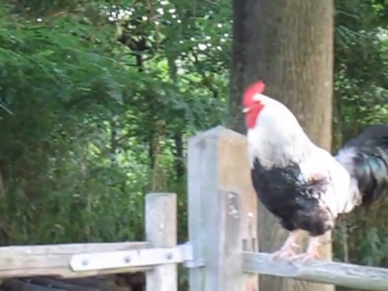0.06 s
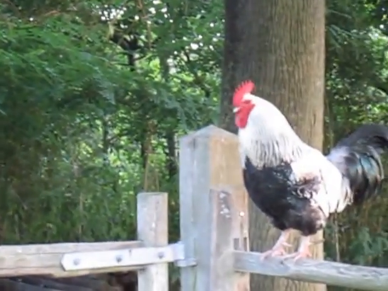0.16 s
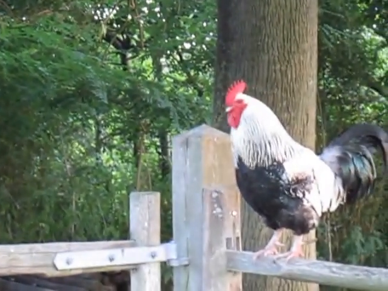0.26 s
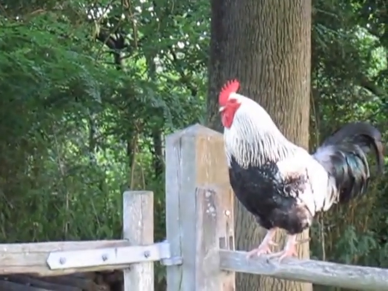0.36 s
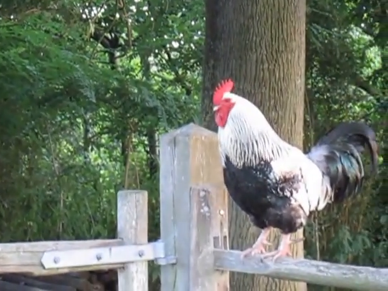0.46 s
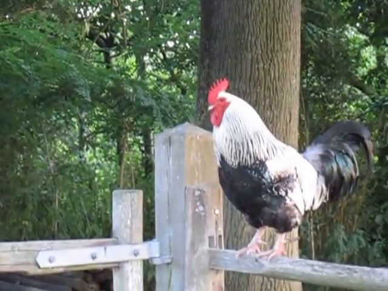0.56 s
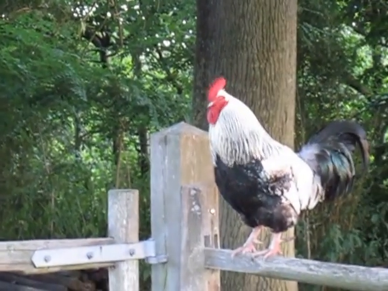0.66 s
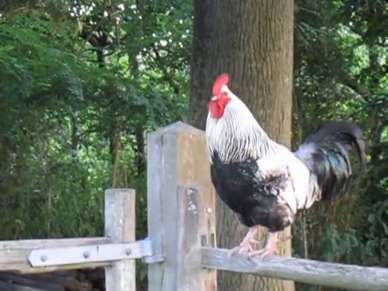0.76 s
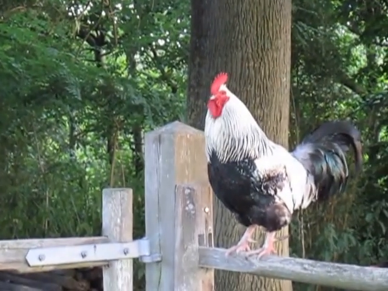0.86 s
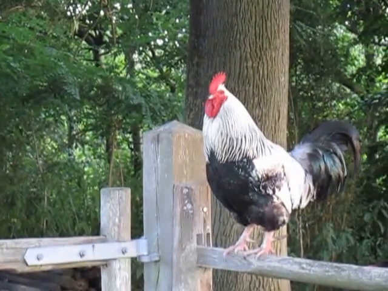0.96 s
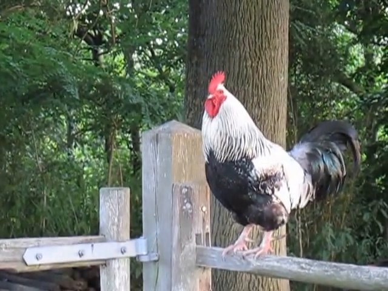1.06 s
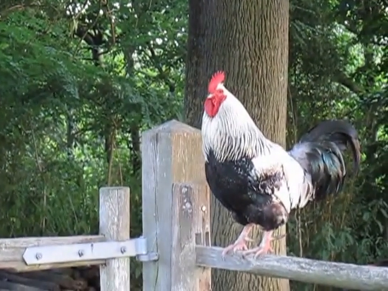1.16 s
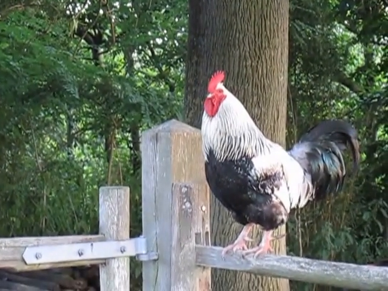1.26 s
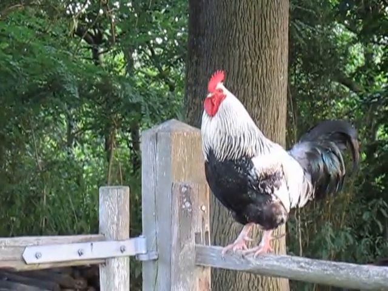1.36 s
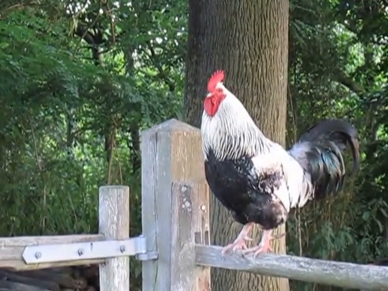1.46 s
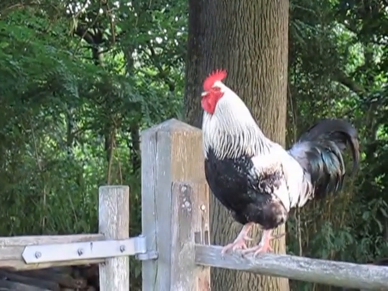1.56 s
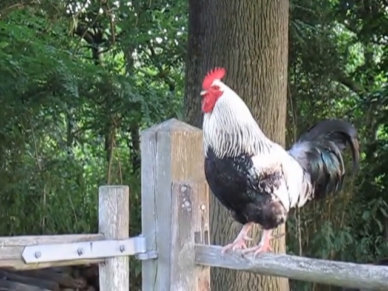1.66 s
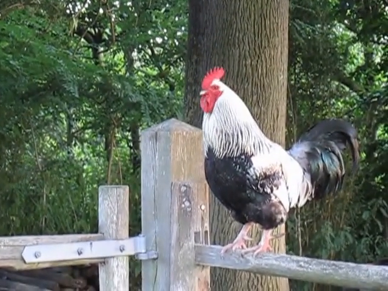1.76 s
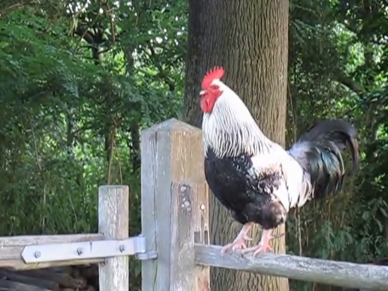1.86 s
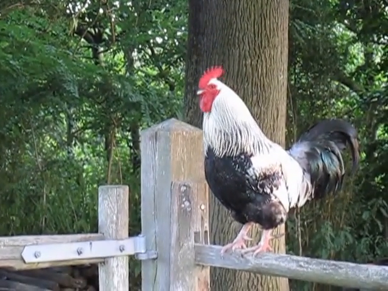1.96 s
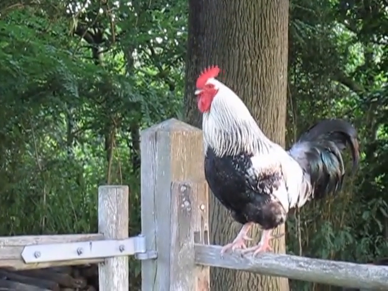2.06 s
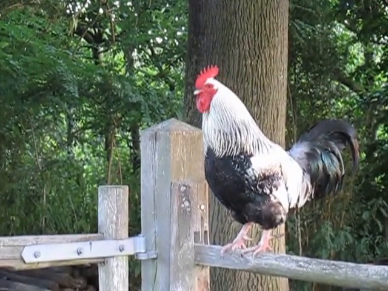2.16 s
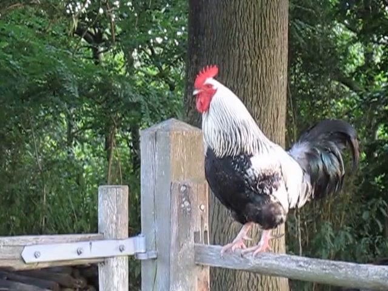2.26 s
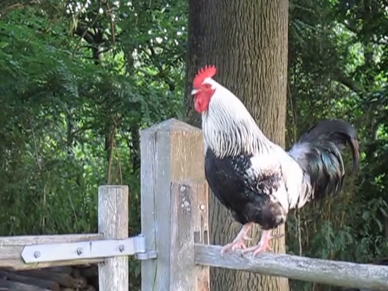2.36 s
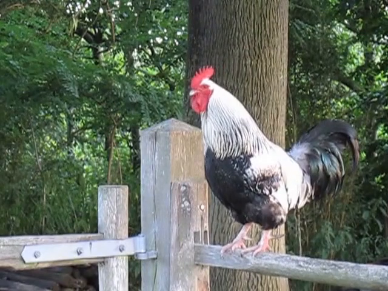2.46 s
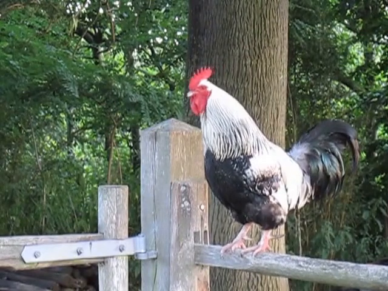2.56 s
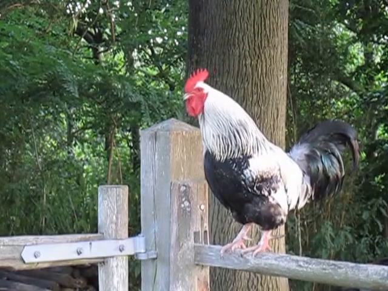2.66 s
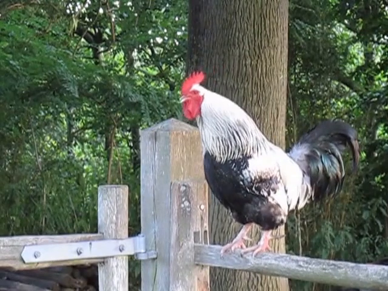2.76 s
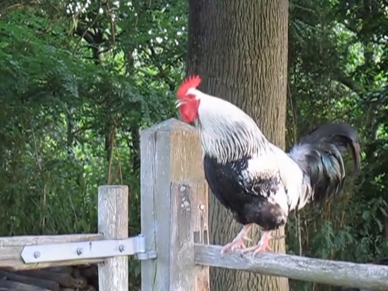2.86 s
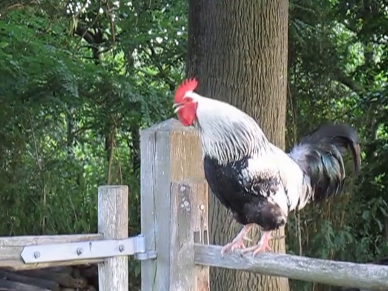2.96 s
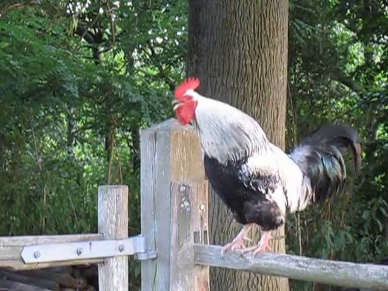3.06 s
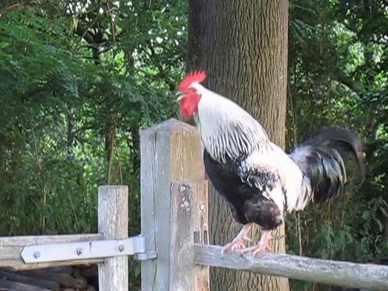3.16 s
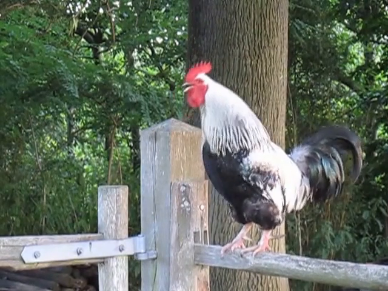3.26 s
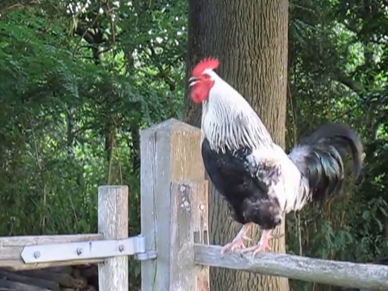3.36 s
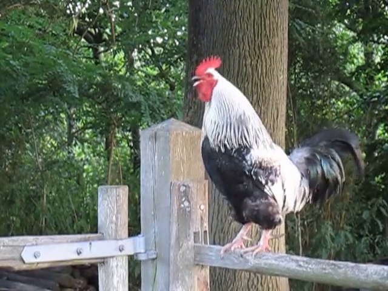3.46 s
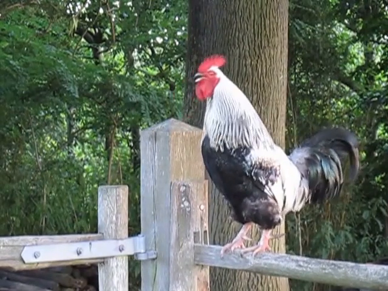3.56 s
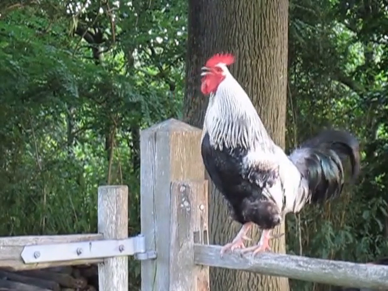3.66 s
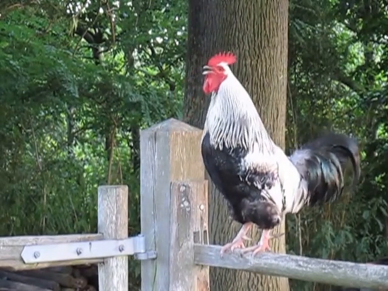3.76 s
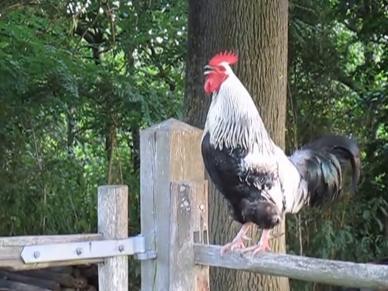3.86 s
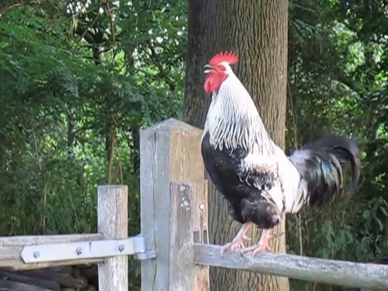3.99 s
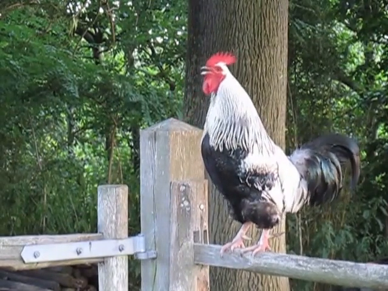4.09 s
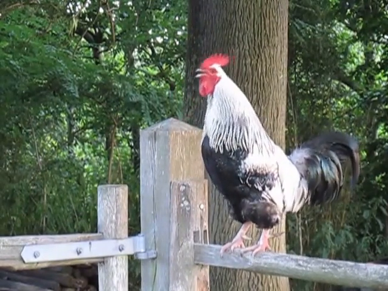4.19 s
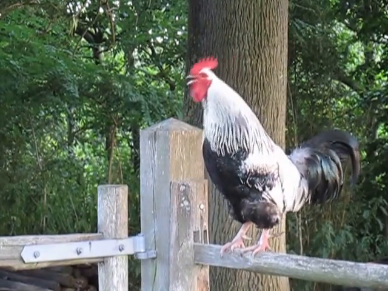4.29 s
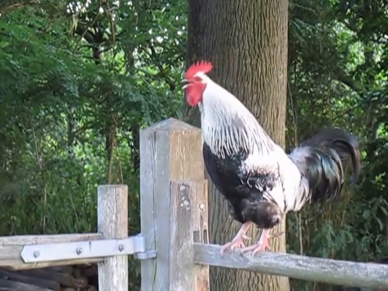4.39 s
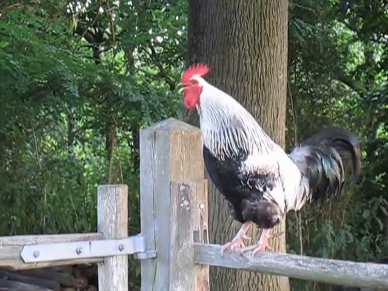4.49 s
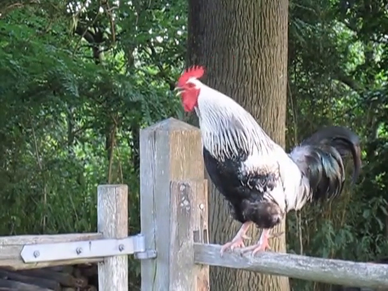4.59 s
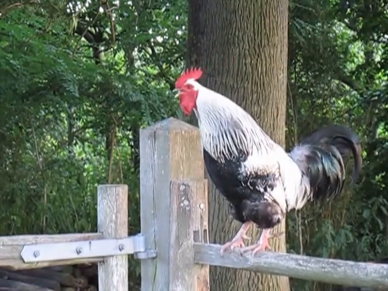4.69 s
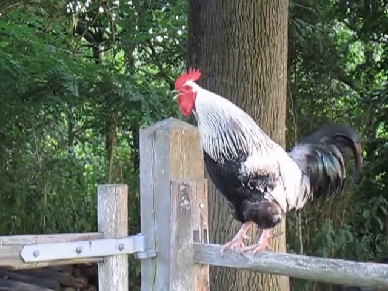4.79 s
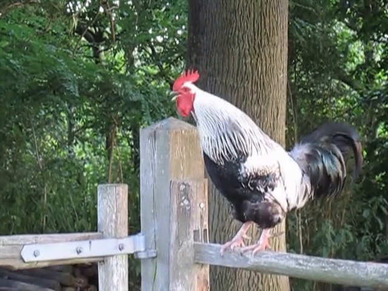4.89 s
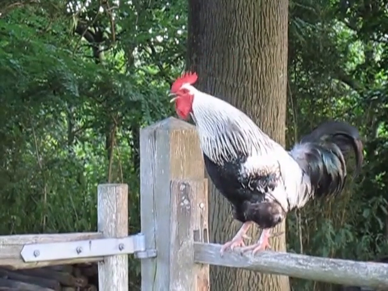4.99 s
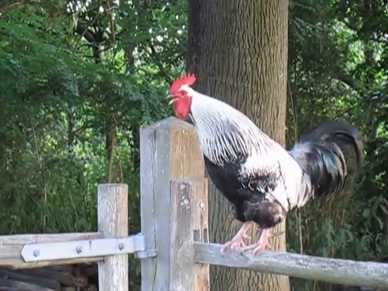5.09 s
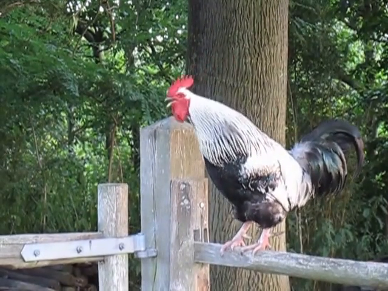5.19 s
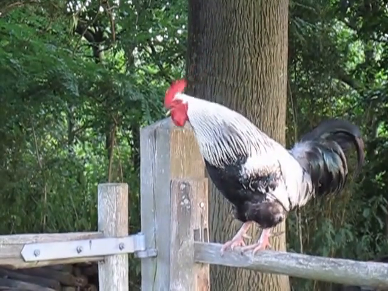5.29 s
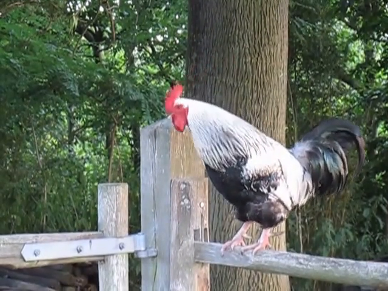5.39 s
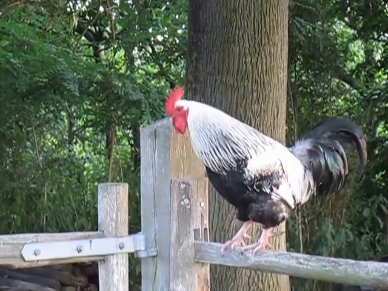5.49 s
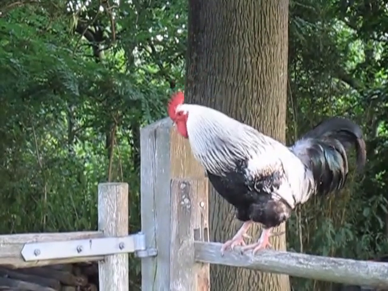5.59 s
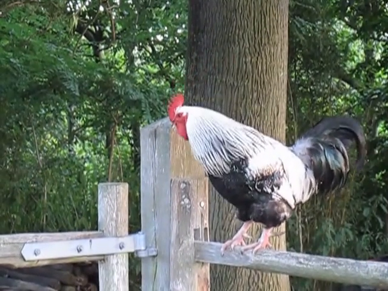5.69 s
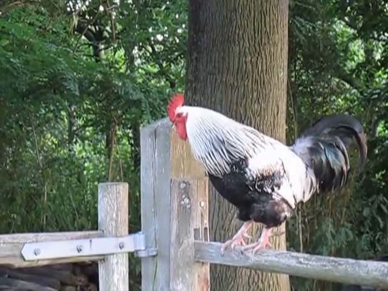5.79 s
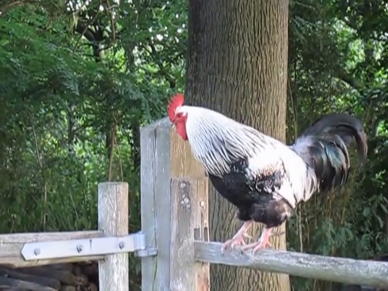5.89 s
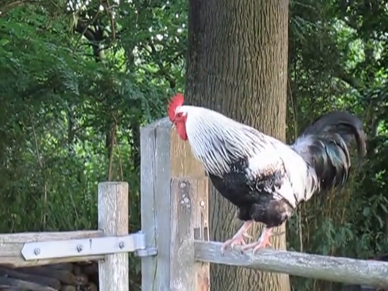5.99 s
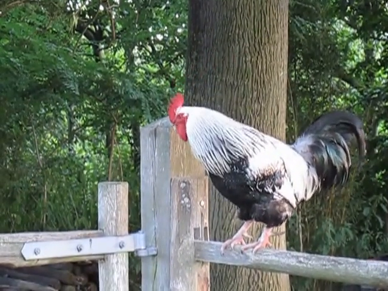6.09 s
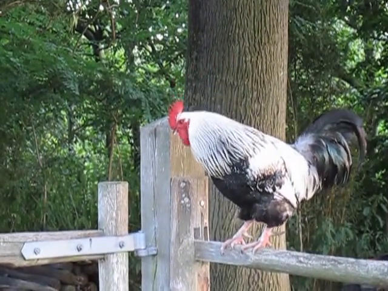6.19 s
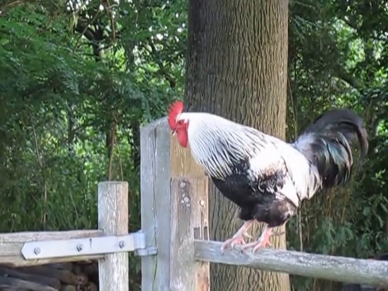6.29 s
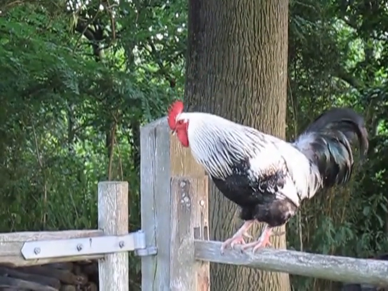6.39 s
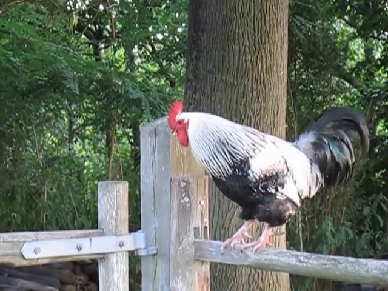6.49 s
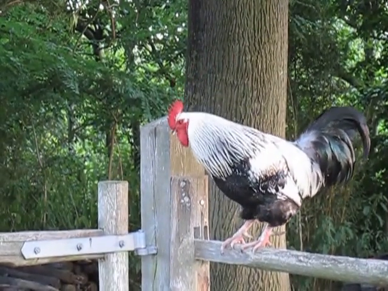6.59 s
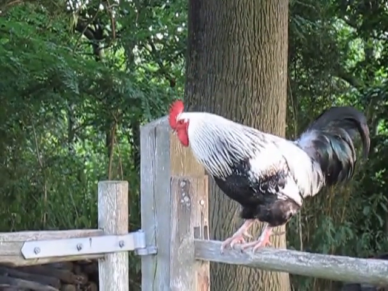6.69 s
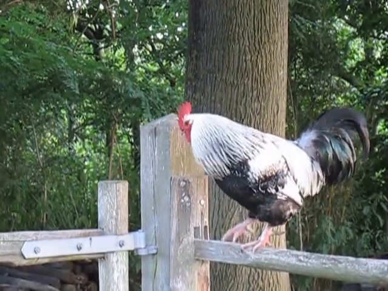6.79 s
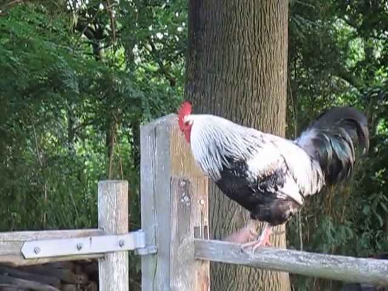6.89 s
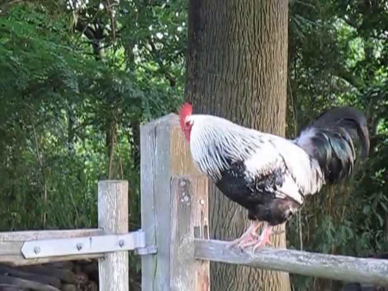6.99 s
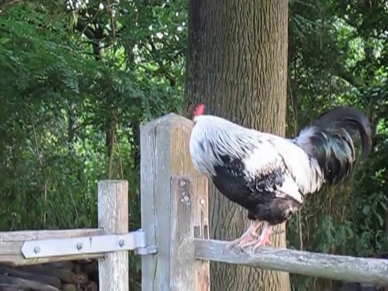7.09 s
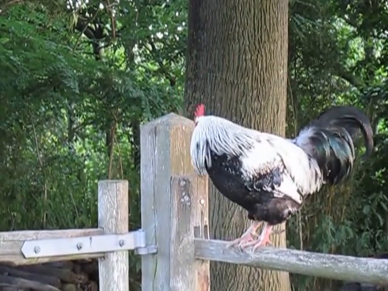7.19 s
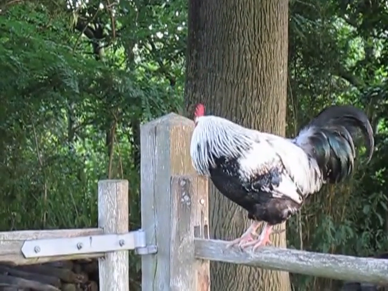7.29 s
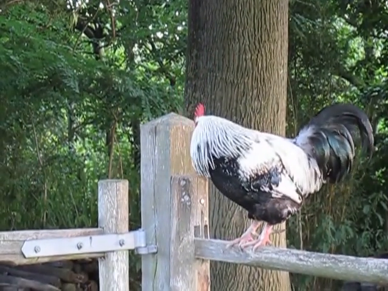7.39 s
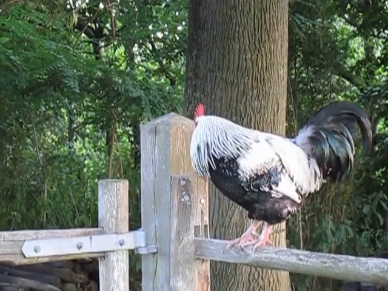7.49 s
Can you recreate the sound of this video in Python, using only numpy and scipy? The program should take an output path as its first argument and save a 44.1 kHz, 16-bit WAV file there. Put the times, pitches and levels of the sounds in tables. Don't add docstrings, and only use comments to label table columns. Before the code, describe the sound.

Beside a wood, distant traffic rumble, a far engine and leafy hiss fill three seconds, with faint handling creaks. A rooster a few metres away crows once: three quick hoarse notes, then a long bright held note, fluttering early, sinking slowly and cutting off. Tree trunks return a brief dull echo. The background is quieter afterwards, as automatic gain backs off; small creaks and finger rustles come near the end.

```python
import sys
import numpy as np
from scipy import signal
from scipy.fft import rfft, irfft, next_fast_len
from scipy.io import wavfile
from scipy.ndimage import uniform_filter1d

SR = 44100
rng = np.random.default_rng(int(sys.argv[2]) if len(sys.argv) > 2 else 0)


def invert_db(level):
    return 10 ** (np.asarray(level, dtype=float) / 20)


def file_out(sig):
    cols = np.atleast_2d(sig).T
    lim = np.clip(cols, -1, 1)
    pcm = np.round(lim * 32767).astype(np.int16)
    wavfile.write(sys.argv[1], SR, pcm)


N = 332778
T = np.arange(N) / SR

# [t/s, pitch f/Hz, effort level/dB, beak opening as gain per partial/dB]
FIRST_NOTE = [(3.084, 587, -37, 8), (3.1, 581, -28.5, 0), (3.14, 604.7, -19.5, -4),
              (3.178, 596.6, -21, -3.5), (3.22, 567.5, -24, -3), (3.252, 558.7, -28, 6.5),
              (3.272, 560.4, -40.5, 4), (3.32, 557, -52, 6)]
SECOND_NOTE = [(3.366, 546.6, -32.5, 6), (3.387, 613.4, -14.5, 1.5), (3.394, 734, -13, -4),
               (3.411, 757, -15, 0), (3.418, 808, -21.5, -8), (3.43, 797, -14.5, 0),
               (3.445, 786.5, -13, 1.5), (3.483, 763, -16.5, -0.5), (3.502, 702, -15.5, 0)]
THIRD_NOTE = [(3.516, 610.4, -14, -3.5), (3.523, 549.6, -23.5, 9), (3.55, 597, -33, -6),
              (3.568, 546.7, -29.5, 10.5), (3.589, 530.6, -27, 11), (3.602, 597, -17, -1.5),
              (3.618, 618, -14.5, 0), (3.623, 650, -14, -6.5), (3.628, 670, -17, -7)]
FINAL_CRACK = [
    (5.343, 606, -20.5, -3.5),
    (5.351, 594, -22, -3.5),
    (5.37, 615, -29.5, 5),
    (5.38, 614, -35, -1),
]
SECOND_PARTIAL_DB = (4.7, 1.5, 0.5, 1.5)
# [f/Hz, level/dB]
WINDPIPE = [(540, -3.5), (780, -6.5), (1150, -2.5), (1280, -13), (1530, -0.5), (1750, -7.5), (2300, -17)]
# [f/Hz, level/dB per Hz]
THROATS = [
    [(1120, -37), (1900, -4), (2580, -22), (2850, -6.5), (3030, 3.5), (3280, -5.5), (4120, -7.5),
     (4690, -28), (5700, -1), (6300, -7.5), (6800, -4), (7400, -17), (7740, -8.5), (10700, -13),
     (11700, -20), (13100, -27), (15500, -52)],
    [(1120, -35), (1900, 3), (2330, 1), (2560, -28), (3000, -9), (4340, -15), (5310, -2), (6160, -40),
     (6790, -11.5), (8610, -14), (9310, -28), (10600, -18), (11700, -40), (13100, -27), (15500, -56)],
    [(1120, -40), (1900, -10), (2230, -22), (2870, 5.5), (3450, -16.5), (4340, -17), (4650, -51),
     (5900, -18), (9480, -19), (15500, -57)],
]
THROAT_DB = (-13, -15, -8)
# [start t/s, end t/s, lowest multiple, highest multiple, change of level/dB]
VEILS = [(3.07, 3.19, 3, 3, -5.5), (3.235, 3.33, 3, 3, -4.5), (3.358, 3.392, 3, 3, -7),
         (3.39, 3.43, 4, 27, -5.5), (3.43, 3.5, 6, 6, -5), (3.527, 3.57, 1, 3, -4),
         (3.18, 3.33, 11, 11, -5), (3.18, 3.33, 13, 13, -4), (3.185, 3.27, 14, 14, 6),
         (3.13, 3.33, 15, 15, -5), (3.085, 3.17, 11, 13, 4), (3.5, 3.6, 16, 27, -5), (3.507, 3.52, 2, 4, 4),
         (3.578, 3.592, 5, 27, -2), (3.597, 3.625, 5, 5, 9.5), (3.599, 3.63, 3, 3, -2.5),
         (5.36, 5.39, 2, 2, -4)]

# [t/s, pitch f/Hz, effort level/dB, beak opening as 2nd partial over 1st/dB]
HELD_NOTE = [
    (3.627, 731.7, -20.5, 6.5),
    (3.88, 738.5, -21, 6.5),
    (4.07, 733.5, -21.5, 7),
    (4.41, 719, -20, 3.5),
    (4.51, 706.8, -21, 2.5),
    (4.66, 704, -24, -3),
    (4.82, 703.2, -22.5, 2),
    (5.22, 684.7, -25.5, 2.5),
    (5.322, 661.3, -24.5, 8),
    (5.344, 612, -24.5, 2),
]
# [multiple of the pitch, level/dB]
UPRIGHT = [(1, -7), (2, 0), (3, -23), (4, -17), (5, -22), (6, -28), (7, -17.5), (8, -36), (9, -39),
           (10, -52), (11, -28.5), (12, -31.5), (13, -57), (14, -41), (15, -48), (16, -55), (17, -44),
           (18, -53), (19, -46), (20, -68), (21, -70)]
BREAKING = [(1, -3), (2, 0), (3, -23), (4, -22), (5, -26), (6, -18.5), (7, -15.5), (8, -24.5), (9, -44),
            (10, -23), (11, -24), (12, -31), (13, -44), (14, -32), (15, -40), (16, -56), (17, -44),
            (18, -41), (19, -37), (20, -44), (21, -60)]
SINKING = [(1, -4), (2, 0), (3, -32), (4, -19.5), (5, -26.5), (6, -31.5), (7, -24), (8, -36), (9, -38),
           (10, -32), (11, -28), (12, -30), (13, -22), (14, -33), (15, -30.5), (16, -38), (17, -38),
           (18, -28.5), (19, -39), (20, -55), (21, -51)]
STRETCHED = [(1, -3), (2, 0), (3, -27), (4, -11), (5, -25), (6, -40.5), (7, -36.5), (8, -33.5), (9, -27.5),
             (10, -10), (11, -34), (12, -28), (13, -18), (14, -32), (15, -40), (16, -33.5), (17, -41),
             (18, -29), (19, -44.5), (20, -43), (21, -48)]
SPENT = [(1, -4), (2, 0), (3, -29.5), (4, -7), (5, -30), (6, -25), (7, -38), (8, -32.5), (9, -27),
         (10, -10), (11, -32), (12, -29), (13, -31), (14, -24), (15, -32), (16, -33), (17, -39), (18, -35),
         (19, -32), (20, -41), (21, -45)]
POSTURE_S = [
    4.165,
    4.19,
    4.252,
    4.28,
    4.558,
    4.698,
    4.991,
    5.061,
]
# [start t/s, end t/s, multiple, change of level/dB]
SHIFTS = [(3.61, 3.7, 4, -9), (3.61, 3.69, 10, 21), (4.034, 4.17, 12, 9), (4.105, 4.2, 4, -6),
          (4.24, 4.36, 4, -12), (4.89, 5.061, 13, -9.5), (5.275, 5.4, 4, -15), (5.27, 5.4, 9, 10.5),
          (5.266, 5.4, 10, -12), (5.27, 5.4, 14, 11), (4.04, 4.2, 13, 7), (4.04, 4.13, 14, 7),
          (4.28, 4.36, 8, 8), (4.28, 4.36, 11, -12), (4.28, 4.36, 12, 7), (4.28, 4.36, 14, -10),
          (4.44, 4.6, 8, -10), (4.5, 4.6, 9, -4), (4.52, 4.76, 12, -7), (4.6, 4.69, 14, -12),
          (4.28, 4.44, 13, -5), (4.5, 4.76, 6, 4), (4.5, 4.76, 5, 3.5), (4.598, 4.76, 11, 5),
          (4.68, 4.76, 3, -6), (4.68, 4.92, 19, -10), (4.76, 5.16, 11, -6), (4.76, 4.86, 7, -8),
          (4.78, 5.07, 14, -7), (4.92, 5.0, 12, 7), (5.16, 5.4, 18, -9), (5.24, 5.4, 3, -7),
          (5.24, 5.4, 7, -9), (5.25, 5.4, 11, 10)]
# [t/s, pitch kick f/Hz]
FLUTTER = [(3.66, 8), (3.69, 8), (3.718, 8), (3.746, 15), (3.772, 8), (3.797, 26), (3.8235, 38),
           (3.8495, 82), (3.877, 72), (3.902, 38), (3.93, 36), (3.957, 20), (3.983, 20), (4.01, 15),
           (4.036, 8), (4.063, 6)]
CHOKE_DB = [
    -7,
    -7.5,
]

# [t/s, half length/s, hoarseness 0-1]
BREAKS = [(3.08, .03, .6), (3.17, .2, .27), (3.295, .08, .5), (3.368, .024, .6), (3.41, .045, .36),
          (3.42, .02, .7), (3.512, .022, .9), (3.545, .04, .65), (3.595, .04, .36), (3.625, .012, .5),
          (3.8, .4, .11), (4.205, .06, .12), (5.357, .04, .7)]
HALF_DB = (-19, -9, 2.5, 4, -0.5)

# [t/s, tick level/dB, snap level/dB, thump level/dB, thump f/Hz]
CREAKS = [(0.0538, -40, -76, -39, 820), (0.4135, -40, -72, -40, 1040), (0.5764, -50, -63.5, -35, 1090),
          (1.7935, -33, -69, -38, 970), (2.593, -29, -53, -36, 214), (6.749, -43, -63, -35, 950),
          (6.7616, -42, -78.5, -41.5, 247), (6.7742, -48, -64, -45, 1060), (6.8185, -47, -62, -58, 807),
          (6.8316, -36, -60, -47, 982), (6.834, -32, -62, -55, 982), (6.8401, -29, -58, -45, 207),
          (6.8507, -47, -57, -52, 937), (6.904, -35, -56, -55, 1010), (6.948, -42, -51, -53, 1010)]
# [t/s, half length/s, level over the rest/dB]
RUSTLE = [
    (6.662, 0.06, 6),
    (6.752, .012, 9),
    (6.836, 0.02, 14),
    (6.88, .08, 2.5),
]

# [f/Hz, level/dB per Hz]
AIR = [(15, -54), (25, -26), (96, -9), (267, -0.5), (340, -3.5), (599, -4), (947, -0.5), (1210, -3),
       (2120, -12), (5020, -19), (6580, -24), (9850, -20), (11900, -35.5), (13600, -32), (15600, -46)]
# [low f/Hz, high f/Hz]
BANDS_HZ = [
    (80, 400),
    (600, 1600),
    (2500, 11000),
    (12000, 15500),
]
# [level/dB, share of road, share of wind, share of the gain drop]
LAYERS = [
    (-44.5, 0.94, .1, 1),
    (-40.5, 0.034, 0.44, 0.94),
    (-48, 0.013, 0.99, 0.91),
    (-74, .1, .9, .6),
]
# [t/s, level/dB]
ROAD = [
    (0, -12),
    (.57, -8),
    (.61, 0),
    (2.02, -2),
    (2.2, 1),
    (3.1, 4.5),
    (5.5, -6),
    (7.55, -9),
]
# [t/s, level/dB]
WIND = [(0, -6), (.31, -4.5), (.57, -0.5), (1.56, 4.5), (1.91, 0.5), (2.06, -3.5), (2.34, -1.5), (2.49, 4),
        (3.06, 3), (5.5, 2.5), (6.24, -2.5), (6.8, 0.5), (7.11, -3.5), (7.55, -3)]
# [t/s, half length/s, level over idle/dB]
ENGINE_SURGES = [
    [(0, .3, 9), (1.2, .9, 8), (3.2, 1.6, 18.5), (4.64, 1.1, 13.5), (6, 1.2, 5)],
    [(1.0, 0.57, 20), (2.1, 1.3, 21.5), (3.3, 1.4, 11), (5.0, .6, 6), (6.8, 0.57, 1.5)],
]
ENGINE_IDLE_DB = (-75, -73)


def walk(rate):
    k = int(SR / rate)
    steps = np.repeat(rng.standard_normal(N // k + 1), k)
    w = uniform_filter1d(uniform_filter1d(steps, k), k)[:N]
    return w / w.std()


def columns(rows):
    s, *rest = np.transpose(rows)
    return [np.interp(T, s, c) for c in rest]


def gate(start_s, end_s, edge_s):
    return np.clip(np.minimum(T - start_s, end_s - T) / edge_s, 0, 1)


def swells(rows):
    return np.max([top * np.clip(1 - np.abs(T - s) / np.abs(half), 0, 1) for s, half, top in rows], axis=0)


def shape_db(points, hz):
    table = np.array(points)
    return np.interp(np.log(hz), np.log(table[:, 0]), table[:, 1])


def band(x, lo_hz, hi_hz):
    sos = signal.butter(2, [lo_hz, min(hi_hz, .45 * SR)], "bandpass", fs=SR, output="sos")
    return signal.sosfilt(sos, x)


def unit(x):
    return x / np.sqrt(np.mean(x ** 2))


def broken_notes():
    all_notes = sum(map(list, (FIRST_NOTE, SECOND_NOTE, THIRD_NOTE, FINAL_CRACK)), [])
    hz, level_db, open_db = columns(all_notes)
    low_db = [level_db + shape_db(WINDPIPE, k * hz) + (k - 2) * open_db for k in range(1, 4)]
    note_ends = [FIRST_NOTE[-1][0], SECOND_NOTE[-1][0], THIRD_NOTE[-1][0]]
    low_db[1] = low_db[1] + np.array(SECOND_PARTIAL_DB)[np.digitize(T, note_ends)]

    effort_db = 10 * np.log10(sum(invert_db(2 * d) for d in low_db))
    which_throat = np.digitize(T, [3.32, 4.5])
    upper_db = []
    for k in range(4, 28):
        colours = [shape_db(c, k * hz) + db for c, db in zip(THROATS, THROAT_DB)]
        upper_db.append(effort_db + np.choose(which_throat, colours))

    throb_db, throb_hz, throb_period_s = 3.5, 10, .0214
    throb = gate(3.11, 3.24, 0.052) * np.cos(2 * np.pi * (T - 3.157) / throb_period_s)
    db = [d + throb_db * throb for d in low_db] + [d + throb_db / 2 * throb for d in upper_db]
    for start, end, low, high, change_db in VEILS:
        change = change_db * gate(start, end, 0.0068)
        db = [d + change if round(low) <= k <= round(high) else d for k, d in enumerate(db, 1)]

    spans = [(FIRST_NOTE, FIRST_NOTE), (SECOND_NOTE, THIRD_NOTE), (FINAL_CRACK, FINAL_CRACK)]
    on = sum(gate(a[0][0] - .003, b[-1][0] + .003, .005) for a, b in spans)
    return syrinx(uniform_filter1d(hz, size=90) + throb_hz * throb, db, on)


def held_note():
    hz, first_db, open_db = columns(HELD_NOTE)
    start_s, end_s = HELD_NOTE[0][0], HELD_NOTE[-1][0]

    falter_s, length_s, period_s = 4.2, 0.096, 0.116
    falter = np.exp(-((T - falter_s) / length_s) ** 2) * np.cos(2 * np.pi * (T - falter_s) / period_s)
    hz = hz - 8.8 * falter
    falter_db = -2.5 * falter

    slip_rise_s, slip_fall_s = .005, .0035
    kick_hz = 0
    for s, kick in FLUTTER:
        slip = kick * np.exp(np.minimum((T - s) / slip_rise_s, (s - T) / slip_fall_s))
        kick_hz = kick_hz + uniform_filter1d(slip, size=70)

    effort_db = uniform_filter1d(first_db, size=4000) + 6.0
    db = []
    for a, e, b, c, d in zip(UPRIGHT, BREAKING, SINKING, STRETCHED, SPENT):
        path_db = [a[1], e[1] - 3, e[1] - 3, b[1] - 3, b[1] - 3, c[1] - 2, c[1] - 2, d[1] - 1.5]
        db.append(effort_db + np.interp(T, POSTURE_S, path_db))
    db[0] = first_db - falter_db
    db[1] = first_db + open_db + falter_db
    for start, end, k, change_db in SHIFTS:
        db[round(k) - 1] = db[round(k) - 1] + change_db * gate(start, end, 0.0076)

    cycle = 2 * np.pi * (T - 3.8505) / .0267
    beads_db = 0.68 * np.cos(cycle) * gate(start_s, 4.214, 0.065)
    for k in range(2, len(db) + 1):
        choke_db = CHOKE_DB[k > 2] * (kick_hz / 80) ** (2 if k == 2 else 1)
        db[k - 1] = db[k - 1] + choke_db - min(k / 2, 3) * beads_db
    on = gate(start_s - .004, end_s + 0.002, 0.0072)
    return syrinx(hz + kick_hz, db, on, 0.0075 * kick_hz)


def syrinx(hz, partial_db, on, rasp=0):
    hoarse, half_db, breath_db = voice()
    hoarse, breath_db = hoarse + rasp, breath_db + 30 * rasp
    wavering = 1 + 0.055 * hoarse * walk(500) + 0.0005 * walk(90)
    phase = 2 * np.pi * np.cumsum(hz * wavering) / SR
    out, last = 0, 0
    for k, db in enumerate(partial_db, 1):
        drift_db = np.clip(.4 * (k - 4), .2, 2) * (.7 * walk(7) + walk(35))
        size = invert_db(uniform_filter1d(db, size=130) + drift_db) * (k * hz < 15600)
        turn = rng.uniform(0, 2 * np.pi) + 0.17 * walk(6)
        out = out + size * np.sin(k * phase + turn)
        half_size = invert_db(half_db + HALF_DB[min(k, len(HALF_DB)) - 1]) * np.sqrt(size * last)
        out = out + half_size * np.sin((k - .5) * phase + turn)
        out = out + invert_db(breath_db + 1.1 * k) * size * np.sin(k * phase) * walk(700)
        last = size
    call = on * out * invert_db(1.3 * hoarse * walk(110))
    return np.sqrt(2) * band(band(call, 400, 18000), 390, 19000)


def voice():
    usual = np.where(T < HELD_NOTE[0][0], .14, .07)
    hoarse = np.maximum(usual, swells(BREAKS))
    half_db = np.minimum(-44 + 58 * hoarse, -6)
    doubled = gate(3.065, 3.135, 0.013) + gate(3.355, 3.392, 0.013)
    doubling_db = 6
    half_db = half_db + doubled * (doubling_db - half_db)
    return hoarse, half_db, np.minimum(-33.5 + 52 * hoarse, -12)


def trunks(x):
    t60_s, gap_s, scatter_db = .38, .018, -19
    slap_s, slap_db = .042, -24
    t = T[:SR // 2]
    echoes = band(rng.standard_normal(len(t)), 460, 9900) * invert_db(-60 * t / t60_s) * (t > gap_s)
    scattered = signal.fftconvolve(x, echoes / np.linalg.norm(echoes))[:N]
    slap = band(np.interp(T - slap_s, T, x, left=0), 900, 2500)
    return invert_db(scatter_db) * scattered + invert_db(slap_db) * slap


def camera():
    whine = np.sqrt(2) * invert_db(-63 + 0.97 * walk(22)) * np.sin(2 * np.pi * 5880 * T)
    since = np.maximum(T - 5.4, 0)
    climb_hz = 11200 - 1400 * np.exp(-since / 1.1) + 70 * walk(150)
    climb_size = (T > 5.4) * invert_db(-61 - 5 * since + 3 * walk(20))
    climb = climb_size * np.sin(2 * np.pi * np.cumsum(climb_hz) / SR)
    hiss = invert_db(-82) * unit(band(rng.standard_normal(N), 13000, 16000))

    rough = rng.standard_normal(N) * invert_db(2.2 * walk(300))
    grains = unit(band(band(rough, 3000, 11700), 2500, 11700))
    rustle = gate(6.55, 7.05, 0.11) * invert_db(-58.5 + swells(RUSTLE)) * grains
    out = whine + hiss + climb + rustle

    t = T[:SR // 40]
    for s, tick_db, snap_db, thump_db, hz in CREAKS:
        chance = rng.standard_normal(len(t))
        tick = band(chance * np.exp(-t / 0.001), 7300, 10200)
        snap = band(chance * np.exp(-t / .0003), 12500, 15000)
        thump = np.exp(-t * hz / 2.5) * np.sin(2 * np.pi * hz * t)
        parts = [(tick_db, tick), (snap_db + 12, snap), (thump_db + 3.5, thump)]
        i = int(s * SR)
        out[i:i + len(t)] += sum(invert_db(d) * v / np.abs(v).max() for d, v in parts)
    return out


def far_engine():
    out = 0
    for idle_db, surges, (hz, width_hz) in zip(ENGINE_IDLE_DB, ENGINE_SURGES, [(58, 4.3), (92, 6.9)]):
        hum = unit(band(rng.standard_normal(N), hz - width_hz, hz + width_hz))
        out = out + invert_db(idle_db + swells(surges)) * hum
    return out


def road_and_leaves():
    size = next_fast_len(N)
    f = np.maximum(np.arange(size // 2 + 1) * SR / size, 1)
    air = rfft(rng.standard_normal(size)) * invert_db(shape_db(AIR, f))
    road_db, wind_db = columns(ROAD)[0], columns(WIND)[0]
    duck_db = -8 * (1 - np.exp(-np.maximum(T - 3.26, 0) / 0.99))
    gains = []
    for (level_db, road, wind, duck), (lo, hi) in zip(LAYERS, BANDS_HZ):
        wanted_db = level_db + road * road_db + wind * wind_db + duck * duck_db
        power = 2 * np.sum(np.abs(air[(f > lo) & (f < hi)]) ** 2) / size ** 2
        gains.append(wanted_db - 10 * np.log10(power))

    knots = np.log([180, 1000, 4000, 11600, 11900])
    out = 0
    for hz in 11750 * 2 ** (np.arange(-26.5, 2) / 3):
        place = np.interp(np.log(hz), knots, [0, 1, 2, 2, 3])
        k = min(int(place), 2)
        blend_db = gains[k] + (place - k) * (gains[k + 1] - gains[k])
        db = blend_db + 1.15 * walk(2.91) + 1.45 * walk(14)
        db = db - 6 * (hz < 230) * gate(3.26, 5.6, 0.18)
        third_octave = np.abs(np.log2(f / hz)) <= 1 / 6
        out = out + invert_db(db) * irfft(air * third_octave, size)[:N]
    return out


def scene():
    crow = broken_notes() + held_note()
    return (crow + trunks(crow) + camera() + far_engine() + road_and_leaves())[None]


def low_pass(x):
    return signal.sosfilt(signal.butter(12, 15710, fs=SR, output="sos"), x)


def record(dry):
    dead_spot = signal.butter(2, [11600, 11980], "bandstop", fs=SR, output="sos")
    bass_cut = signal.butter(3, 45, "highpass", fs=SR, output="sos")
    mix = signal.sosfilt(np.vstack([dead_spot, bass_cut]), dry)
    return low_pass(mix)


dry = scene()
out = record(dry)
file_out(out)
```